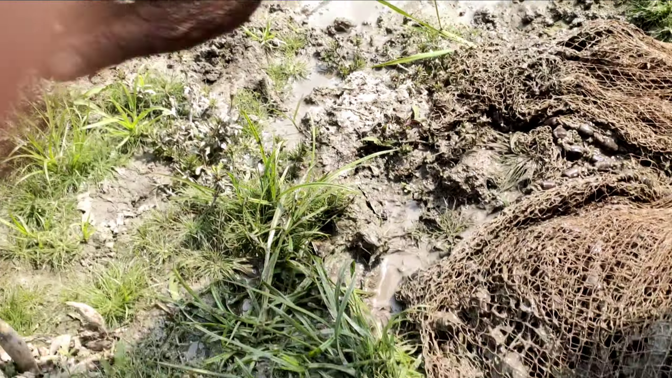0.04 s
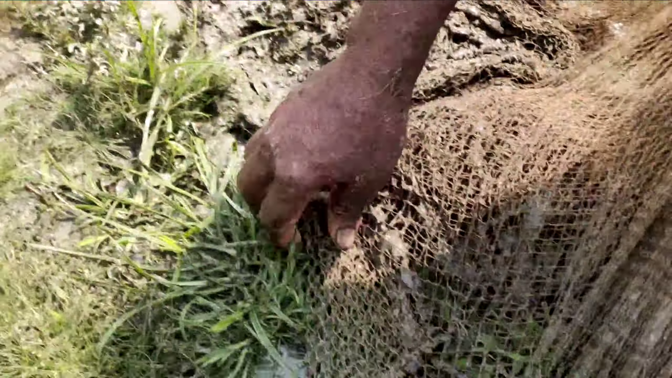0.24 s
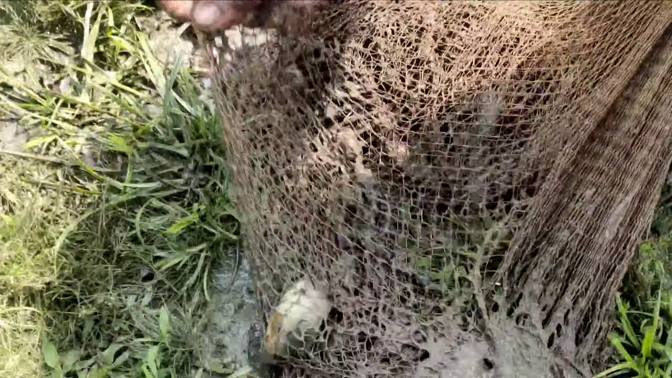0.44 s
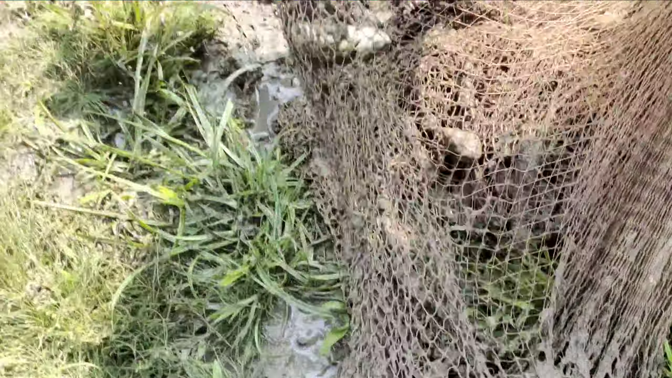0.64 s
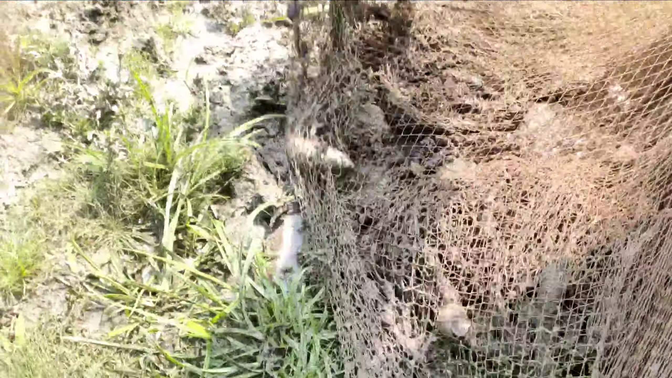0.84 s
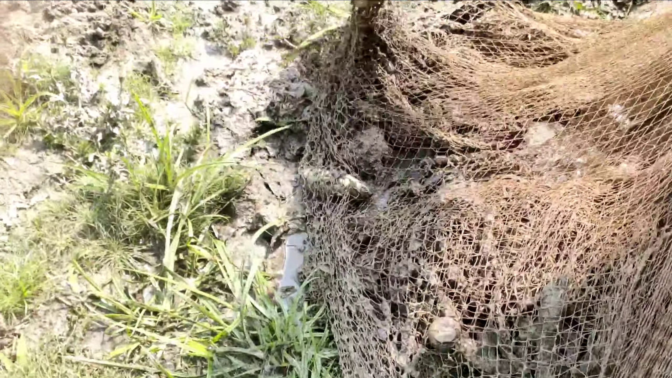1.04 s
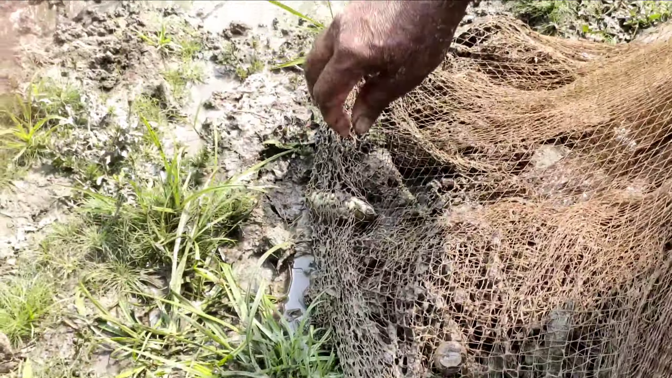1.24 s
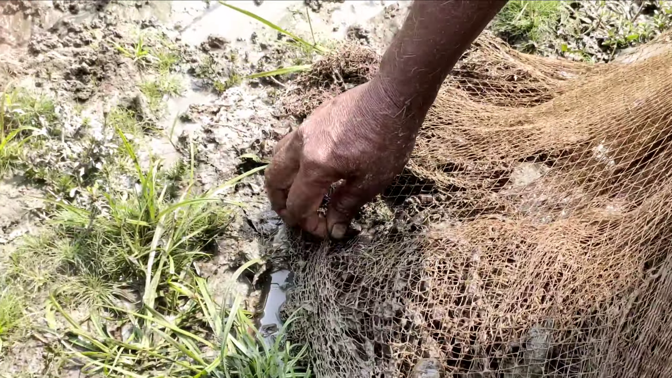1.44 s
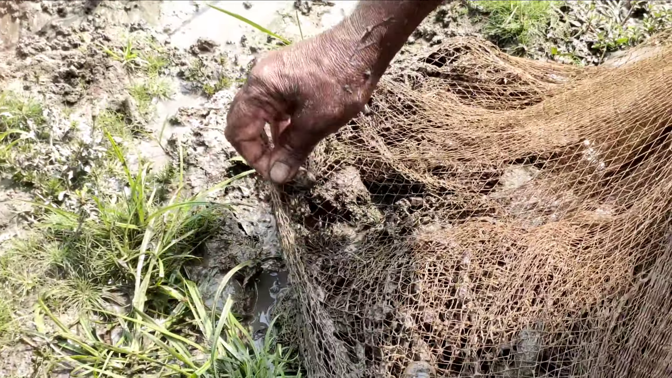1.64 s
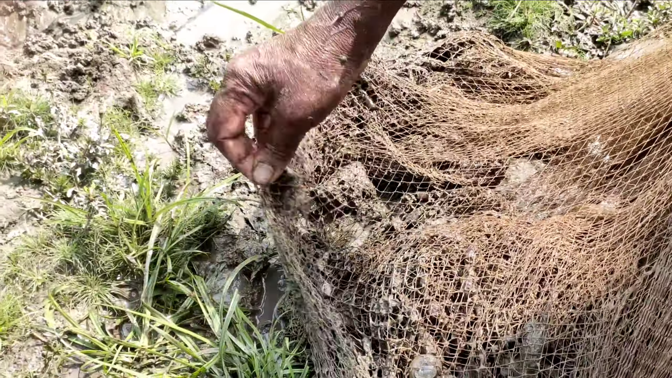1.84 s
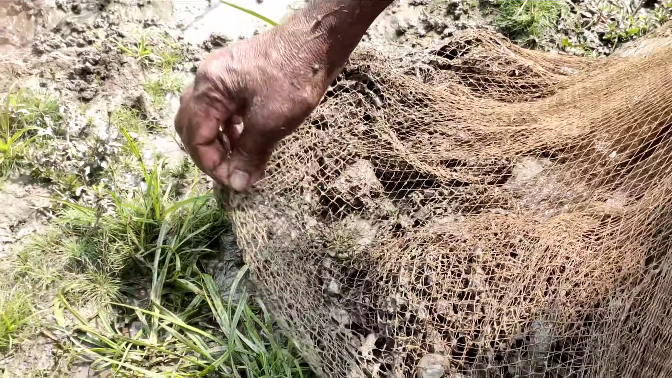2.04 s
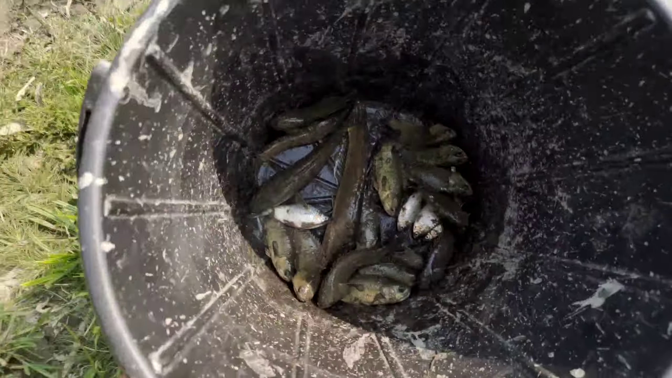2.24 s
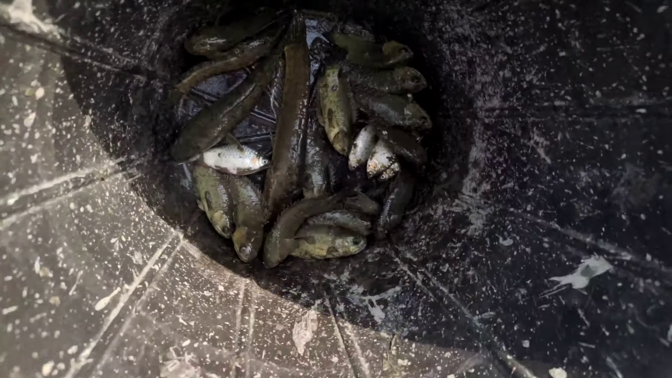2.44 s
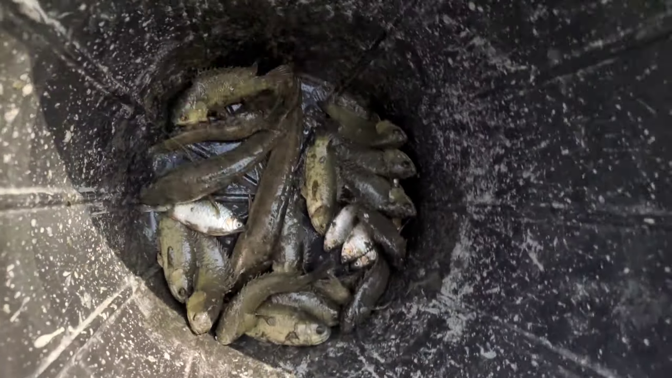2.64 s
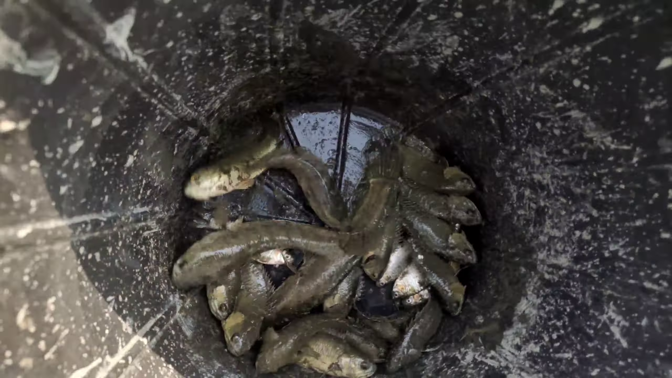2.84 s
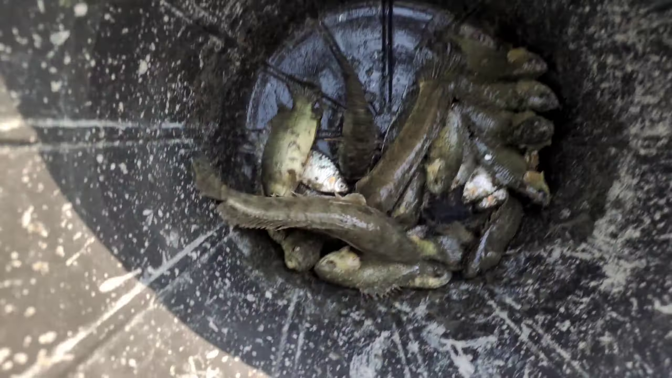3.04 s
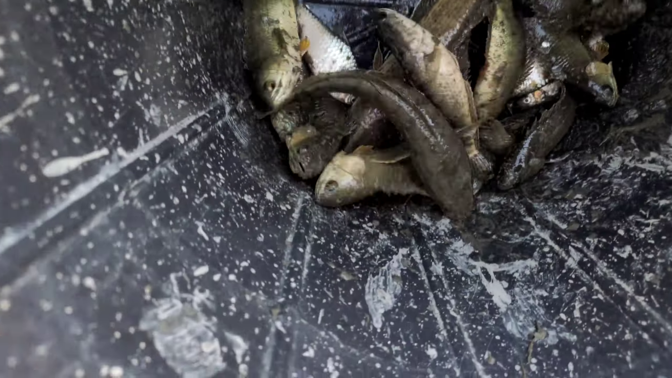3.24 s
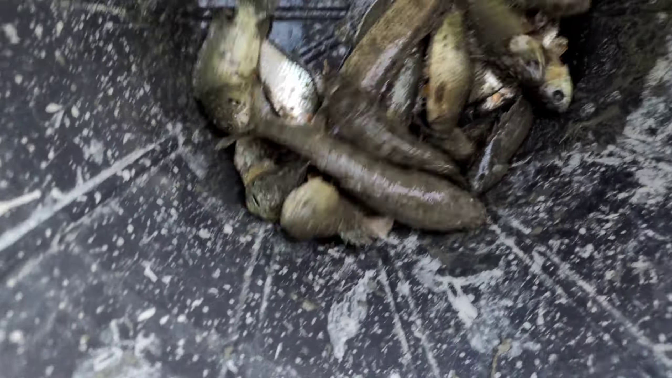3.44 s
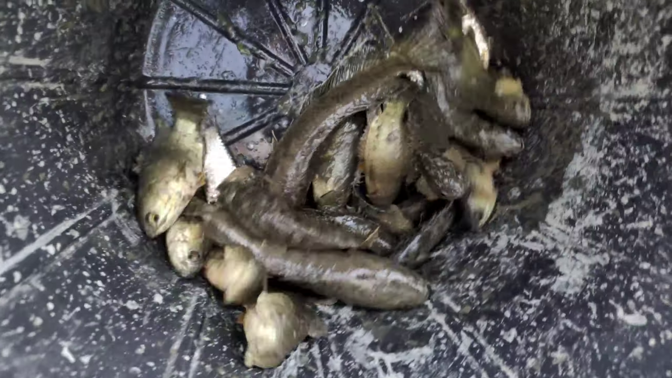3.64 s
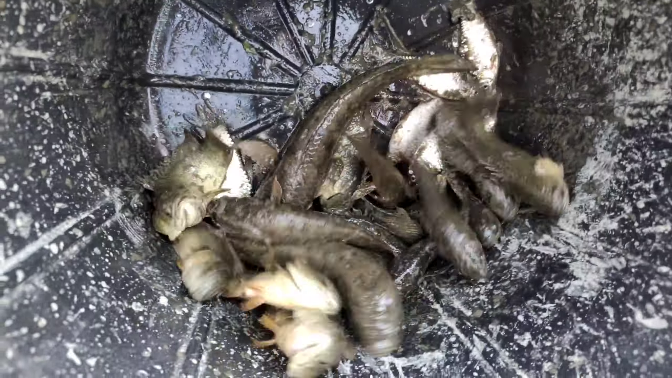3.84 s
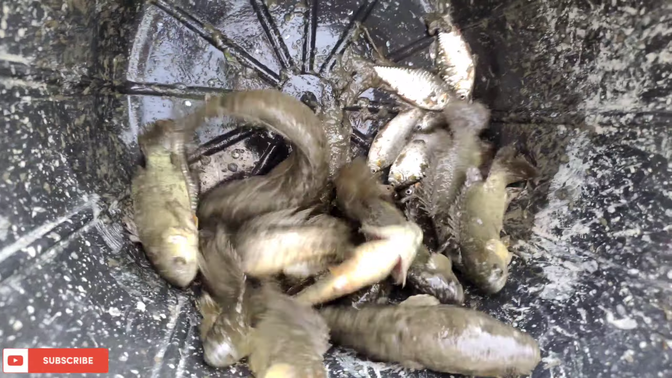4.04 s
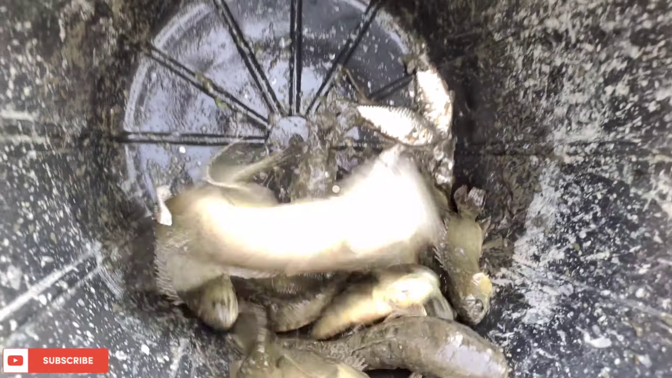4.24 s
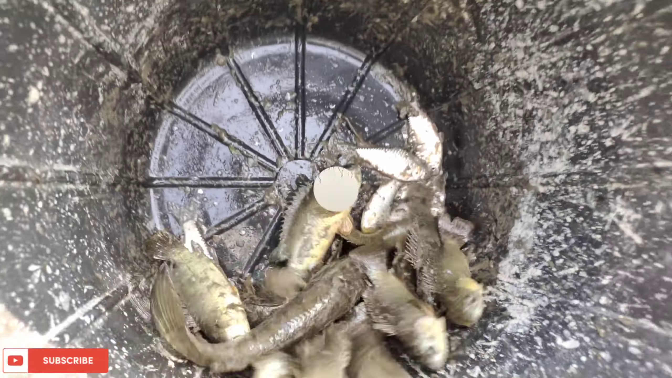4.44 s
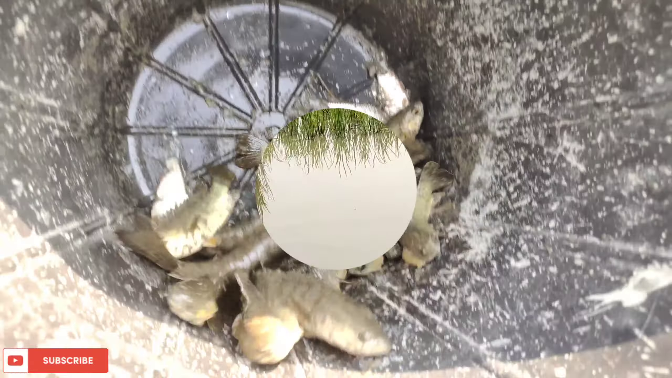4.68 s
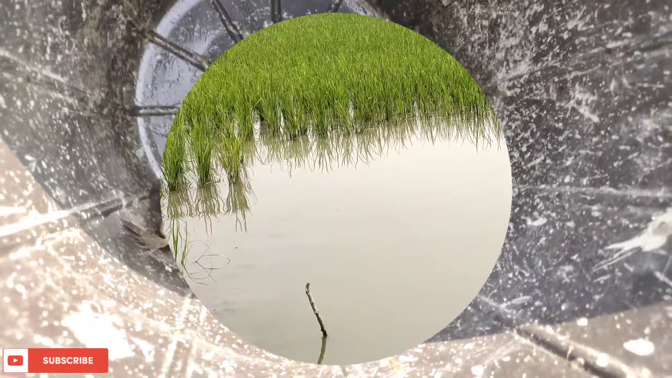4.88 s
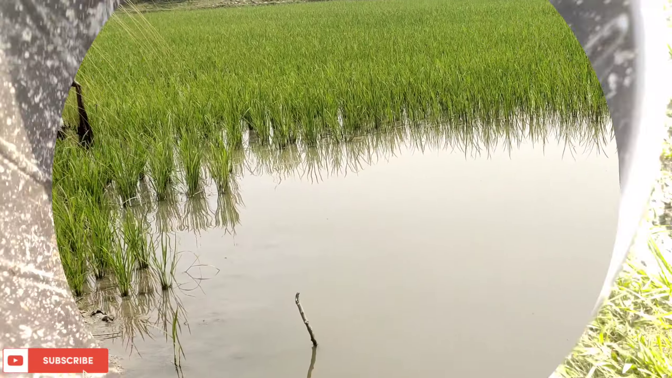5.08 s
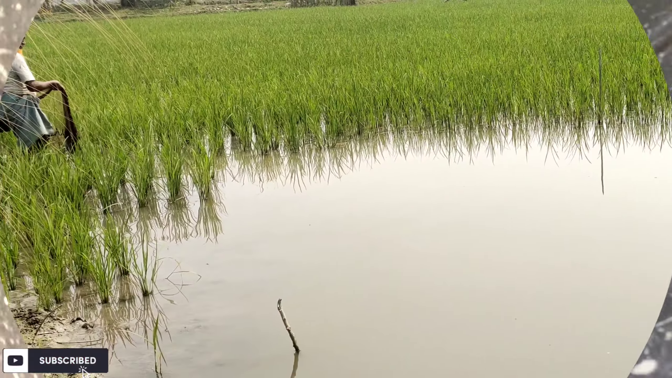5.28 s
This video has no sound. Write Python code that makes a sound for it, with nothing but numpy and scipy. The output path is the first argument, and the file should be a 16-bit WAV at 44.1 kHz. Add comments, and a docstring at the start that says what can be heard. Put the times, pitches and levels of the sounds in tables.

```python
"""First a wet net rustles beside a plastic bucket at the edge of a wet field, and live fish flap in the bucket.
Bodies thump the base (decaying resonances), fish and net slap, flick and squirt (shaped crackling bursts),
and the slimy heap squelches and patters (patchy coloured noise), with scraping fins and sharp dry clicks.
Far behind, birds whistle (gliding sines with echo) over a low rumble (coloured noise)."""
import sys
import numpy as np
from scipy import signal
from scipy.fft import rfft, irfft, next_fast_len
from scipy.io import wavfile
from scipy.ndimage import uniform_filter1d, map_coordinates

SR = 44100
rng = np.random.default_rng(int(sys.argv[2]) if len(sys.argv) > 2 else 0)


def store_wav(level_fs):
    """Save 16-bit WAV to argv[1]."""
    pcm = np.round(np.clip(np.atleast_2d(level_fs), -1, 1) * 32767)
    wavfile.write(sys.argv[1], SR, pcm.T.astype(np.int16))


N = 234256

# bodies landing on the base:
# (time [s], level [dB], ring [Hz], wall knock [dB], length of the push [s], at least 1 ms)
LANDINGS = [(0.162, -22.5, 212, -9, 0.0026), (0.176, -16, 295, -4.5, 0.0074), (0.299, -27, 293, -6, .0047),
            (0.337, -42, 248, -1.5, 0.0014), (0.388, -45, 255, -25, .005), (0.446, -38, 196, -30, 0.0026),
            (0.505, -31, 271, -36, 0.0067), (0.549, -32, 299, -19, .003), (0.634, -22.5, 285, -19, 0.0058),
            (0.727, -31.5, 248, -16.5, 0.0038), (0.748, -34, 289, -13.5, 0.0037),
            (0.832, -42, 289, -16, .007), (0.89, -35, 292, -9, 0.0067), (0.977, -38, 234, -3, 0.0024),
            (1.051, -41, 235, -10, 0.0044), (1.415, -44, 279, -15, 0.0056), (2.455, -39.5, 310, -4, 0.0061),
            (2.807, -28.5, 264, -6, 0.0023), (2.896, -27, 254, -12, 0.008), (2.942, -27, 306, -19, 0.0091),
            (2.98, -9, 281, -13.5, 0.0045), (3.061, -15.5, 276, -38, 0.0047),
            (3.1, -19, 273, -13.5, 0.0032), (3.193, -29.5, 274, -12, 0.0035),
            (3.32, -29.5, 280, -1.5, 0.0031), (3.459, -31, 282, -25, 0.0023), (3.57, -28, 289, -4, .0045),
            (3.642, -28.5, 264, -22, 0.003), (3.856, -31, 241, -5, 0.0074), (3.941, -18, 290, -3.5, 0.0026),
            (4.022, -16.5, 282, -8.5, 0.0063), (4.059, -21.5, 316, -19, 0.007),
            (4.089, -9.5, 270.3, -15.5, 0.0093), (4.144, -26, 259, -7, 0.0061),
            (4.217, -15, 219, -13.5, 0.0035), (4.246, -29.5, 247, -10, 0.0014),
            (4.282, -25, 226, -18, 0.0053), (4.366, -28.5, 285, -29, 0.002),
            (4.501, -31.5, 293, -15, 0.00099), (4.623, -30, 244, -20, 0.001),
            (4.665, -31.5, 206, -16.5, 0.001), (5.235, -43, 254, -17, 0.0035)]


def thumps():
    """Superposition: the heavy landings add up, alike at both ports."""
    out = np.zeros((2, N))
    for s, *landing in LANDINGS:
        add(out, s, thump(*landing))
    return out


# resonances of the bucket wall, before a small random spread:
# (frequency [Hz], relative level [dB], t60 [s])
WALL_MODES = [(467, -17, 0.013), (580, -3.5, 0.052), (665, 5, 0.027), (847, -1.5, 0.036)]


def thump(db, hz, knock_db, push, damping=0.0058, tail_db=-26, air_hz=268, wall_db=-4,
          wall_rise=0.0013, flop_db=-20, flop_t60=0.098):
    """Forced resonance: a push rings the base at a pitch set by the load lying on it; the wall knocks along."""
    air_t60 = .22  # s
    t, push = np.arange(SR // 4) / SR, max(push, .001)
    u = t / push
    swell = (u * np.exp(1 - u)) ** (push / damping)  # a long push swells slowly
    base = swell * np.sin(2 * np.pi * hz * t)
    onset = np.minimum(u, 1)
    # the air in the bucket hums on
    air = onset * amp(tail_db - 60 * t / air_t60) * np.sin(2 * np.pi * air_hz * t)
    wall = np.zeros(len(t))
    for mode_hz, mode_db, t60 in WALL_MODES:
        decay = amp(mode_db + rng.normal(0, 2.4) - 60 * t / t60)
        wall += decay * np.sin(2 * np.pi * mode_hz * rng.normal(1, .03) * t)
    knock = amp(wall_db + knock_db) * np.minimum(t / wall_rise, 1) * wall
    flop = onset * amp(flop_db - 60 * t / flop_t60) * rubbing(len(t))  # the soft body settles
    return amp(db) * (base + air + flop + knock)


# spectrum of bodies dragging on the base: (frequency [Hz], relative level [dB per Hz])
RUB_SPECTRUM = [(25, -18), (60, -29.5), (100, -2.5), (160, -0.5), (280, 0), (340, -2), (450, -31.5),
                (700, -27.5)]


def rubbing(n, apart=0.23):
    """Friction noise: a dull random drag on the base, nearly alike at both ports."""
    noise = rng.standard_normal(n) + apart * rng.standard_normal((2, n))
    return unit(coloured(noise, RUB_SPECTRUM))


LEAD_IN_S = .02  # a short soft swell leads into each slap

# wet slaps, flicks and squirts of fish and net that stand out: (time [s], level [dB],
# flatness from 0 glancing to 1 full on, relative spray [dB], t60 [s], left-right [dB])
BLOWS = [(0.1179, -45.5, 0.49, -34, 0.015, 7), (0.1612, -22, 0.78, -23.5, 0.016, 13.5),
         (0.1713, -14.5, 0.73, -27, 0.054, -3), (0.232, -36, .4, 4.5, 0.0099, -5),
         (0.4658, -31.5, 0.44, -2.5, 0.014, -4), (0.4924, -39.5, 0.74, -11, 0.072, 3),
         (0.5336, -33.5, 0, 5.5, 0.03, -3), (0.563, -22, 0.048, -1.5, .03, -5),
         (0.5712, -35, 0.14, 8, 0.028, -10), (0.611, -25.5, 0, 2, 0.034, -4),
         (0.7489, -26.5, 0.14, -5, 0.015, 3), (0.764, -40, 0.085, 2, 0.028, -2.5),
         (0.8005, -40, 0.09, 4.5, .026, -10), (0.8706, -29.5, 0, 16, 0.018, 0),
         (0.8827, -31, 0.2, 6, 0.059, -14), (0.9163, -32, 0.18, 2.5, 0.053, -2),
         (0.9454, -37, 0.43, 0, .07, -3), (0.9634, -31.5, 0.8, -21, 0.069, -3.5),
         (0.9795, -28, 0.35, -4, 0.062, 0), (1.0464, -19.5, 0.67, -8, 0.032, 0.5),
         (2.4493, -39.5, 0.91, -9, 0.062, 1), (2.8555, -24, 0.88, -3.5, 0.047, 5),
         (2.8761, -24, 0.58, -7, 0.014, -4), (2.9331, -29, 0.98, -11, 0.055, 5.5),
         (2.9623, -27, .9, -10, 0.038, -2), (2.9815, -26.5, 0.79, -19, 0.019, 1),
         (3.0224, -27.5, 0.85, -17, 0.0372, 5.5), (3.027, -22.5, 0.78, -7.5, 0.033, 2.5),
         (3.0904, -34.5, 1, -11, 0.07, 4), (3.1838, -15.5, .6, -11, 0.039, -0.5),
         (3.274, -31.5, 0.74, -3.5, 0.02, 3), (3.3305, -28, .9, -2.5, 0.041, -4),
         (3.3955, -26.5, 0.76, -9.5, 0.025, -2), (3.455, -31, 0.9, -25, 0.057, 1),
         (3.6426, -31, .95, -5.5, 0.063, 0.5), (3.689, -35, 0.41, 7, 0.04, 3),
         (3.8582, -31.5, 0.41, 10.5, 0.02, 5), (3.8794, -17.5, 0.34, 4.5, .019, 2.5),
         (3.9214, -25, 0.15, 0.5, 0.11, -2.5), (3.9409, -12, 0.85, -8.5, 0.033, -3),
         (4.0136, -12.5, 0.86, -3.5, 0.057, -3.5), (4.0345, -18.5, .2, -4.5, 0.023, -12),
         (4.0416, -20.5, 0.52, -12, .04, -3.5), (4.0575, -23, 1, -5, 0.042, -9.5),
         (4.0794, -25, 0.89, 6.5, 0.044, -3.5), (4.102, -23, 0.55, -18.5, 0.056, -7),
         (4.1358, -17.5, .7, -5.5, .027, -1), (4.1455, -23.5, 0.93, -25, 0.027, -10.5),
         (4.219, -19, 0.63, -5.5, 0.037, -2.5), (4.286, -26, 0, -4.5, 0.025, -8),
         (4.3185, -17, 0.28, -2.5, 0.032, -5.5), (4.3482, -25, 0.77, -4.5, 0.045, -3),
         (4.383, -28, 0.66, -2.5, 0.15, -2), (4.56, -34.5, 0.44, 4, 0.058, -0.5),
         (4.5964, -23.5, 0.65, -2, .033, -4), (4.7054, -36, 1, -23, 0.035, -1),
         (4.9657, -48.5, 0.58, -19, 0.19, -3), (5.1572, -50.5, 0.63, -21, 0.032, 13),
         (5.238, -49.5, 0, -3, 0.1, -11)]


def slaps():
    """Superposition: each slap, flick or squirt sounds at its own time, after a short soft swell."""
    out = np.zeros((2, N))
    for s, *blow in BLOWS:
        add(out, s - LEAD_IN_S, slap(*blow))
    return out


# spectra of the hollow smack, the crack and the spray: (frequency [Hz], relative level [dB per Hz])
SMACK_SPECTRUM = [(250, -57), (480, -7.5), (720, 0.5), (830, 4), (950, -7.5), (1250, 2.5), (1600, -2.5),
                  (2300, -8.5), (4000, -63)]
CRACK_SPECTRUM = [(700, -54), (1300, -6), (1900, -1), (3000, 4), (4200, 1), (5500, -3.5), (8000, -34)]
SPRAY_SPECTRUM = [(3000, -61), (5500, 7), (7500, 13.5), (10000, 14.5), (12500, 20), (15000, 14),
                  (16500, -18)]
# (glancing, full on): a flatter slap is hollower and traps a bigger pocket of air
SMACK_DB, POCKET_HZ, SLAP_RISE_S = (-29.5, 0), (4500, 1095), (0.00087, 0.001)


def slap(db, flat, spray, t60, pan_db, lead_db=-16, lead_t60=0.0096, hold_share=0.052, ragged_db=1.0,
         tail_db=-29, tail_t60=0.6, crack_db=-13.0, spray_db=-8, pocket_db=-12, pocket_q=7):
    """Impact noise: a short soft swell, then a wet burst of smack, crack, popping air pocket and spray."""
    t = np.arange(SR // 6) / SR - LEAD_IN_S  # the burst starts at zero
    smack_db, hz, rise = (np.interp(flat, (0, 1), ends) for ends in (SMACK_DB, POCKET_HZ, SLAP_RISE_S))
    t60 = max(t60, .003)
    # a brief hold, a fast decay, and a faint slow tail
    blow = amp(-60 * np.maximum(t - hold_share * t60, 0) / t60) + amp(tail_db - 60 * t / tail_t60)
    lead_in = amp(lead_db - 60 * np.abs(t) / lead_t60)
    shape = np.clip(t / rise, 0, 1) * blow + lead_in
    ragged = amp(ragged_db * wobble(len(t), 507))
    burst = shape * ragged * crackle(len(t), rate=6500, spread_db=4, hiss=.7)
    pocket = signal.lfilter(*signal.iirpeak(hz, pocket_q, SR), burst)
    parts = [(coloured(burst, SMACK_SPECTRUM), smack_db),
             (coloured(burst, CRACK_SPECTRUM), crack_db),
             (pocket, pocket_db),
             (coloured(burst, SPRAY_SPECTRUM), spray + spray_db)]
    sound = sum(amp(part_db) * unit(part) for part, part_db in parts)
    sound = sound * np.sqrt(np.mean(shape ** 2))
    return sound * amp(db + np.clip(pan_db, -16, 16) * np.array([[.5], [-.5]]))


# how hard the heap wriggles: (time [s], effort [dB])
EFFORT = [(2.199, -66.5), (2.31, -56.5), (2.5, -54), (2.779, -52.5), (2.87, -46), (3.04, -52.5),
          (3.39, -50), (3.6, -49), (3.93, -40.5), (4.01, -42), (4.081, -31), (4.16, -42.5), (4.38, -43.5),
          (4.56, -48.5), (4.69, -47), (4.78, -64), (5.08, -67), (5.31, -58.5)]


def patter(spray_db=-5, pan_spread_db=4, t60=0.025, most_db=-42):
    """Random point process: small flaps at irregular moments, stronger as the heap grows lively, up to a limit."""
    per_s, over_effort_db, spread_db = 22, 9, 7
    out, (times, effort) = np.zeros((2, N)), np.transpose(EFFORT)
    draws = rng.random((int((times[-1] - times[0]) * per_s), 4))
    for k, (when, size, flat, side) in enumerate(draws):
        s = times[0] + (k + when) / per_s
        db = min(np.interp(s, times, effort), most_db) + over_effort_db - spread_db * size
        add(out, s - LEAD_IN_S, slap(db, np.sqrt(flat), spray_db, t60, pan_spread_db * (2 * side - 1)))
    return out


# spectra of the sticky splats and their treble fizz: (frequency [Hz], relative level [dB per Hz])
SQUELCH_SPECTRUM = [(300, -23), (500, -11), (720, 0), (850, -3), (970, -2.5), (1220, 4), (2200, -6),
                    (4000, -8.5), (6000, -16.5), (9000, -40.5)]
FIZZ_SPECTRUM = [(3000, -29.5), (5200, 1), (6500, -1.5), (8000, -12), (10000, -8.5), (12500, 2),
                 (15000, -10.5), (16500, -3)]


def wriggle(rub_db=-1, squelch_db=4.0, fizz_db=-5, rub_grows=1.08, fizz_grows=1.3, splat_db=1.0,
            slide_db=-1.44, lumps_db=3):
    """Friction noise: sliding slimy bodies splat stickily over a dull rubbing; more effort is brighter."""
    busy_db = -48  # the effort at which the layers keep their set balance
    effort = level(EFFORT) / amp(busy_db)
    sticky = crackle(N, rate=1200, spread_db=4.2, hiss=.5)
    sticky = patchy(sticky, depth_db=4, hz_span=600, s_span=.014)  # splats of differing colour
    sticky = sticky * amp(splat_db * wobble(N, 70) + slide_db * wobble(N, 18))
    rub = amp(rub_db + lumps_db * wobble(N, 30)) * effort ** rub_grows * rubbing(N)
    squelch = amp(squelch_db) * effort * unit(coloured(sticky, SQUELCH_SPECTRUM))
    fizz = amp(fizz_db) * effort ** fizz_grows * unit(coloured(sticky, FIZZ_SPECTRUM))
    return amp(busy_db) * (rub + squelch + fizz)


# fins scraping along the wall: (end time [s], level built up to [dB], length [s])
FIN_SCRAPES = [(2.39, -30, .13), (3.782, -33, .07), (4.718, -41, .03)]
# spectrum of the grating: (frequency [Hz], relative level [dB per Hz])
SCRAPE_SPECTRUM = [(500, -0.5), (1000, 2), (1600, 11.5), (3800, 1), (4700, 2.5), (6000, -15), (13000, -26),
                   (16000, -25)]


def scrapes():
    """Friction under growing load: fin spines grate harder and harder, then slip off."""
    build_db, release = 18, .012  # rise in dB, final fade in s
    out = np.zeros((2, N))
    for end, db, length in FIN_SCRAPES:
        to_go = np.arange(int(length * SR))[::-1] / SR
        grit = unit(coloured(crackle(len(to_go), rate=2500, spread_db=2, hiss=.35), SCRAPE_SPECTRUM))
        build = amp(db - build_db * np.sqrt(to_go / length))
        add(out, end - length, grit * build * np.minimum(to_go / release, 1))
    return out


# sharp dry clicks, some far to one side, the first a touch on the microphone:
# (time [s], level [dB], pitch [Hz], left-right [dB])
DRY_CLICKS = [(0.2665, -30.5, 1750, 24.5), (0.8701, -15, 7000, 2), (1.0485, -13.5, 1870, 4.5),
              (1.2474, -44, 4070, 12), (1.6405, -43.5, 7920, -2.5), (2.028, -30.5, 4200, 0.5),
              (3.1860, -28, 2230, 6), (3.881, -46, 6000, -6.5), (4.0156, -20.5, 2520, 3),
              (4.0575, -18.5, 1470, 30)]


def clicks(cycles=6, grit=0.65, echo_db=-20, echo_t60=0.036):
    """Damped impulse: a sharp spike, 60 dB down after a few cycles, with a faint short echo."""
    out, t = np.zeros((2, N)), np.arange(SR // 20) / SR
    for s, db, hz, pan_db in DRY_CLICKS:
        ring = np.cos(2 * np.pi * hz * t) + grit * rng.standard_normal(len(t))
        spike = amp(-60 * t * hz / cycles) * ring
        echo = rng.standard_normal((2, len(t))) * amp(echo_db - 60 * t / echo_t60)
        band = signal.butter(1, [hz / 4, min(2 * hz, 15000)], "band", fs=SR)
        click = signal.lfilter(*band, spike + echo)
        add(out, s, click / np.abs(click).max() * amp(db + pan_db * np.array([[.5], [-.5]])))
    return out


# the wet net being picked over: (time [s], relative rustle [dB])
NET_RUSTLE = [(0.0, -68.5), (0.14, -65.5), (0.33, -58), (0.67, -54.5), (0.81, -59.5), (1.51, -77),
              (1.81, -68.5), (2.0, -61.5), (2.2, -64)]
# spectrum of the twine: (frequency [Hz], relative level [dB per Hz])
MESH_SPECTRUM = [(300, -10.5), (700, -12), (1000, -1), (1450, -9.5), (2100, -6.5), (2900, -9), (4200, -10),
                 (6300, -25.5), (7500, -23), (14000, -23), (16000, -33.5)]


def net(rustle_db=1):
    """Friction noise: wet twine drags over mud and grass, then stops being heard at the last table row."""
    strands = crackle(N, rate=1500, spread_db=3, hiss=.25)
    strands = patchy(strands, depth_db=3.5, hz_span=800, s_span=.018)
    heard = np.arange(N) / SR < NET_RUSTLE[-1][0]
    return amp(rustle_db) * level(NET_RUSTLE) * heard * unit(coloured(strands, MESH_SPECTRUM))


# a far bird's calls of three falling notes: (start [s], level of the last note [dB])
BIRD_CALLS = [(0.502, -51), (1.222, -50), (1.948, -48.5), (2.567, -56), (3.301, -47), (4.892, -64)]
# other far whistles: (time [s], level [dB], length [s], first pitch [Hz], last pitch [Hz])
FAR_WHISTLES = [(4.75, -63, .12, 1370, 1480), (4.99, -62, .06, 3100, 2650), (5.04, -65, .13, 2760, 2790)]


def birds():
    """Direct and reflected sound: birds around the field, the farther ones with stronger echo."""
    calls = []
    for s, db in BIRD_CALLS:
        for k in range(3):  # each note louder, longer and starting lower
            calls.append((s + k * .083, db + (k - 2) * 2, .034 + k * .007, 1372 - k * 61, 880))
    # a small bird's trill of five quick falling chirps, loudest in the middle
    chirps = [(1.804 + k * .0465, -56.5 - 1.2 * (k - 2) ** 2, .02, 4220, 2630) for k in range(5)]
    near = whistles(calls, echo_db=-7, echo_t60=.55)
    trill = whistles(chirps, echo_db=1, echo_t60=.4)
    return near + trill + whistles(FAR_WHISTLES, echo_db=-1.5, echo_t60=0.34)


def whistles(notes, echo_db, echo_t60):
    """Frequency glide and reverberation: each note slides in pitch; the field's edge answers."""
    out = np.zeros(N)
    for s, db, length, first_hz, last_hz in notes:
        u = np.linspace(0, 1, int(max(length, .01) * SR))
        hz = last_hz + (first_hz - last_hz) * (1 + np.cos(np.pi * u)) / 2
        phase = 2 * np.pi * np.cumsum(hz) / SR
        add(out, s, amp(db) * np.sin(np.pi * u) * np.sin(phase))
    t = np.arange(SR // 2) / SR
    tail = rng.standard_normal((2, len(t))) * amp(-60 * t / echo_t60)
    tail = tail / np.linalg.norm(tail[0])
    return out + amp(echo_db) * signal.fftconvolve(out[None], tail, axes=1)[:, :N]


# the far-off rumble with its faint air: (time [s], level [dB])
RUMBLE_LEVEL = [(0, -60.5), (1.3, -64), (2.2, -70.5), (4.7, -78), (4.8, -90), (5.31, -74)]
# its spectrum: (frequency [Hz], relative level [dB per Hz])
OUTDOOR_SPECTRUM = [(15, -81), (25, -30.5), (48, -37), (66, -5), (92, 2.5), (180, 1.5), (200, -2.5),
                    (373, -16.5), (1130, -51), (1370, -56), (1520, -44.5), (5430, -33.5), (6210, -47.5),
                    (7310, -40.5), (16000, -55)]


def outdoors():
    """Diffuse noise: a low far-off rumble under faint air, partly shared by the two ports."""
    air = rng.standard_normal(N) + .5 * rng.standard_normal((2, N))
    air = patchy(air, depth_db=2, hz_span=400, s_span=.033)
    return level(RUMBLE_LEVEL) * unit(coloured(air, OUTDOOR_SPECTRUM))


def crackle(n, rate, spread_db, hiss):
    """Shot noise: tiny bursts, rate a second, reach both ports directly and by brief scattering, over hiss."""
    sizes = amp(spread_db * np.clip(rng.standard_normal(n), -2, 2))
    pops = (rng.random(n) < rate / SR) * rng.standard_normal(n) * sizes
    t = np.arange(SR // 100) / SR
    scatter = rng.standard_normal((2, len(t))) * amp(-60 * t / .016)
    paths = 1.1 * scatter / np.linalg.norm(scatter[0])
    paths[:, 0] += 1  # the direct sound
    heard = signal.fftconvolve(pops[None], paths, axes=1)[:, :n]
    return unit(heard) + hiss * rng.standard_normal((2, n))


def patchy(x, depth_db, hz_span, s_span):
    """Time-frequency modulation: random swells and gaps, local in pitch and time."""
    z = signal.stft(x, nperseg=256)[2]
    field = rng.standard_normal(z.shape[1:])
    for axis, span in enumerate([hz_span * 256 / SR, s_span * SR / 128]):
        size = max(round(span), 1)
        field = uniform_filter1d(uniform_filter1d(field, size, axis), size, axis)
    gain = amp(depth_db * np.clip(unit(field), -2.5, 2.5))
    return signal.istft(z * gain, nperseg=256)[1][:, :x.shape[1]]


def wobble(n, rate):
    """Random modulation: a smooth curve, rate knots a second."""
    return map_coordinates(rng.standard_normal(int(n * rate / SR) + 4), [np.arange(n) * rate / SR])


def level(rows):
    """Envelope: a gain per sample from (time [s], level [dB]) rows, practically silent before the first."""
    return amp(np.interp(np.arange(N) / SR, *np.transpose(rows), left=-120))


def coloured(x, spectrum, size=2048):
    """Minimum-phase filtering: causal colouring, so nothing sounds before its cause."""
    cepstrum = irfft(np.log(amp(along(spectrum, np.fft.rfftfreq(size, 1 / SR)))))
    cepstrum[1:size // 2] *= 2
    cepstrum[size // 2 + 1:] = 0
    impulse = irfft(np.exp(rfft(cepstrum)))
    return signal.fftconvolve(x, impulse[None], axes=1)[:, :x.shape[-1]]


def filtered(x, response):
    """Linear filtering: x times a response of frequency."""
    m = next_fast_len(x.shape[-1] + SR // 10)
    return irfft(rfft(x, m) * response(np.fft.rfftfreq(m, 1 / SR)), m)[..., :x.shape[-1]]


def along(points, hz):
    """Logarithmic pitch scale: (frequency [Hz], value) points interpolated on a log axis."""
    f, v = np.transpose(points)
    return np.interp(np.log(hz + 1), np.log(f + 1), v)


def amp(db):
    """Level law: decibels to gain."""
    return 10 ** (np.asarray(db) / 20)


def unit(x):
    """Mean power: scale to rms 1."""
    return x / np.sqrt(np.mean(x ** 2) + 1e-20)


def add(track, s, sound):
    """Superposition: mix a sound in at time s."""
    part = track[..., max(round(s * SR), 0):][..., :sound.shape[-1]]
    part += sound[..., :part.shape[-1]]


# how far the left port lags on the slaps, patter, clicks, wriggling, scrapes and net:
# (frequency [Hz], phase [radians])
LEFT_LAG = [(0, 0.5), (750, 0), (1000, 3.5), (1650, 3.5), (3200, 11), (16000, 52)]


def scene(alike_hz=600):
    """Stereo cues: long waves reach both ports alike; the bucket lies to the right, so the left hears it later."""
    left, right = slaps() + patter() + clicks() + wriggle() + scrapes() + net()
    mid = (left + right) / 2
    side = filtered((left - right) / 2, lambda hz: hz ** 2 / (hz ** 2 + alike_hz ** 2))
    left = filtered(mid + side, lambda hz: np.exp(-1j * np.interp(hz, *np.transpose(LEFT_LAG))))
    return np.array([left, mid - side]) + thumps() + birds() + outdoors()


# colour of the two microphone ports: (frequency [Hz], left-right [dB])
PORT_BALANCE = [(200, -3), (700, -3), (1300, -0.5), (2400, 6.5), (4400, 2), (8000, -6.5), (14000, 6.5)]


def record(dry, low_hz=70):
    """Transducer response: the ports colour each side, thin the bass, notch the treble and limit the band."""
    top_hz = 16200
    dry = signal.lfilter(*signal.butter(2, low_hz, "high", fs=SR), dry)

    def response(hz):
        """Cascaded filters: their gains multiply."""
        notch = amp(-11 * np.exp(-((hz - 9100) / 330) ** 2))
        sides = amp(along(PORT_BALANCE, hz) * np.array([[.5], [-.5]]))
        return notch * sides * np.clip((top_hz - hz) / 400 + .5, 0, 1)

    return filtered(dry, response)


dry = scene()
out = record(dry)
store_wav(out)
```